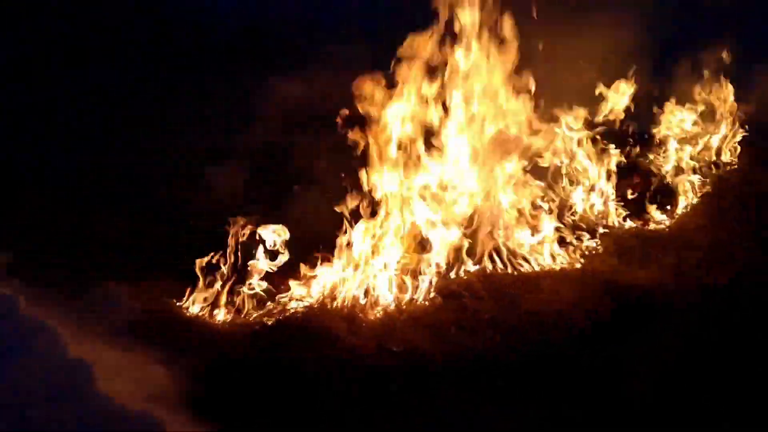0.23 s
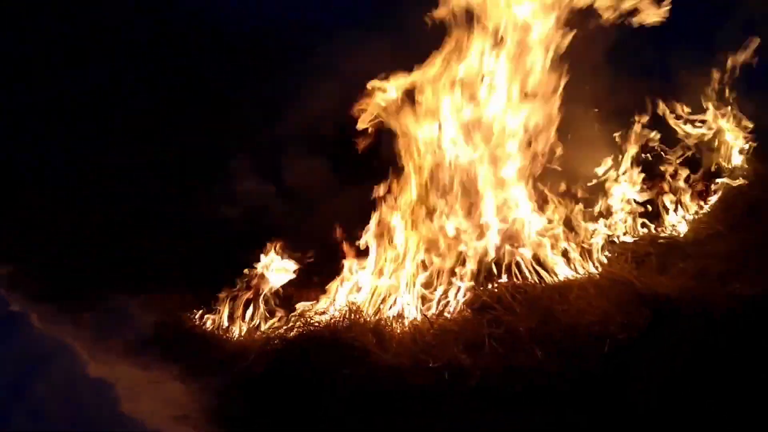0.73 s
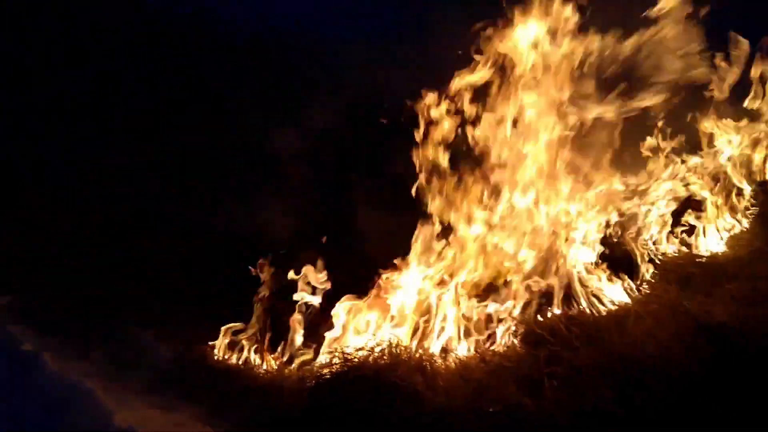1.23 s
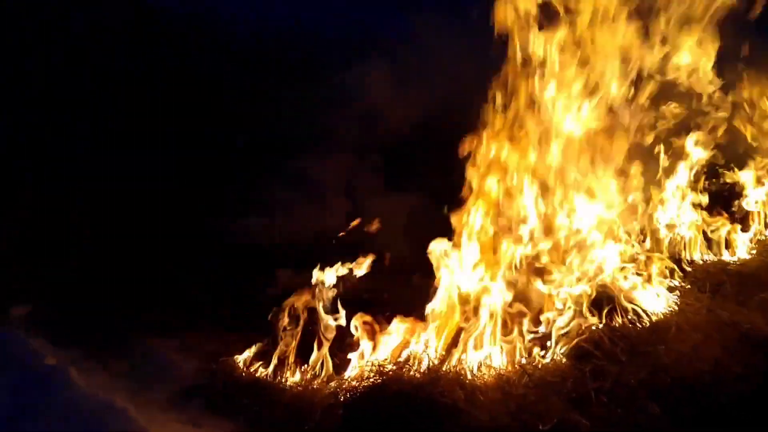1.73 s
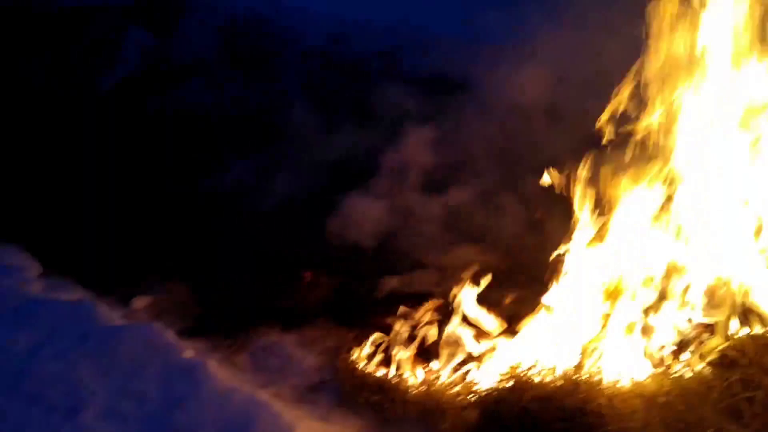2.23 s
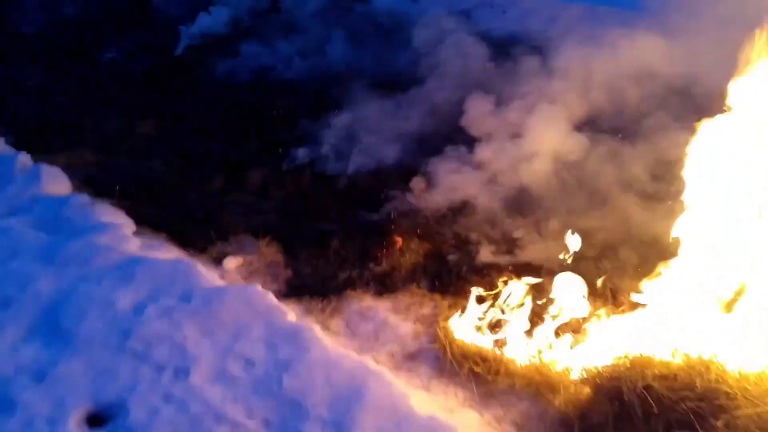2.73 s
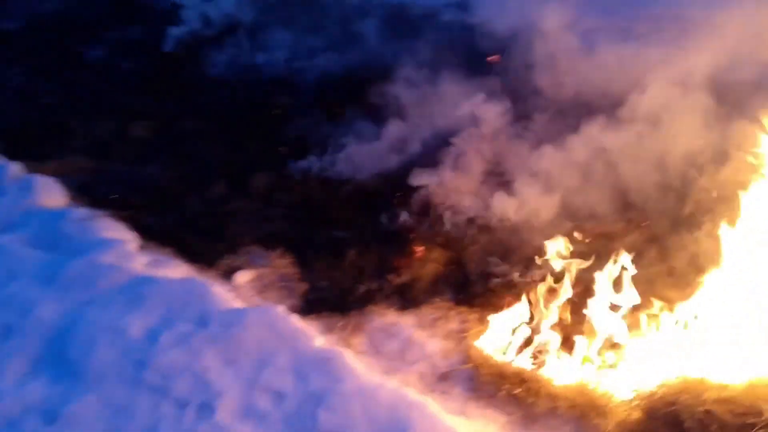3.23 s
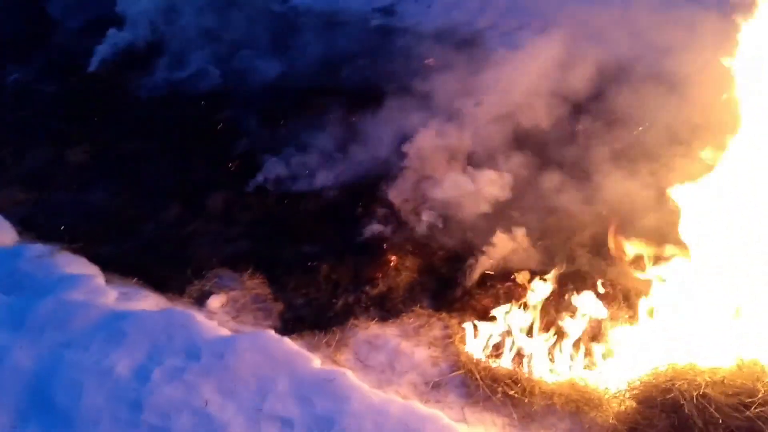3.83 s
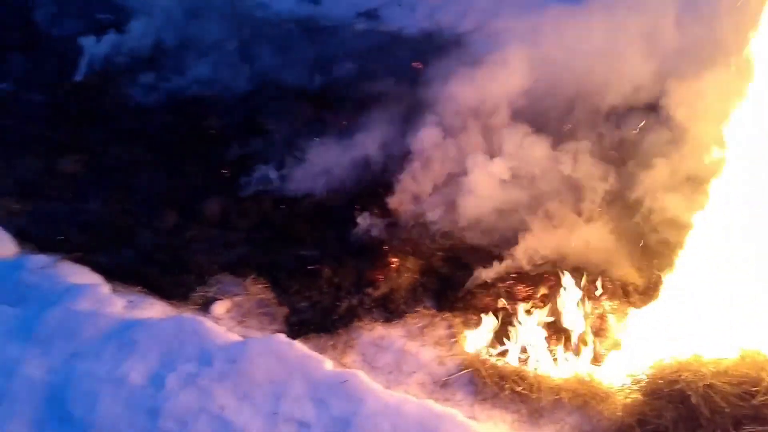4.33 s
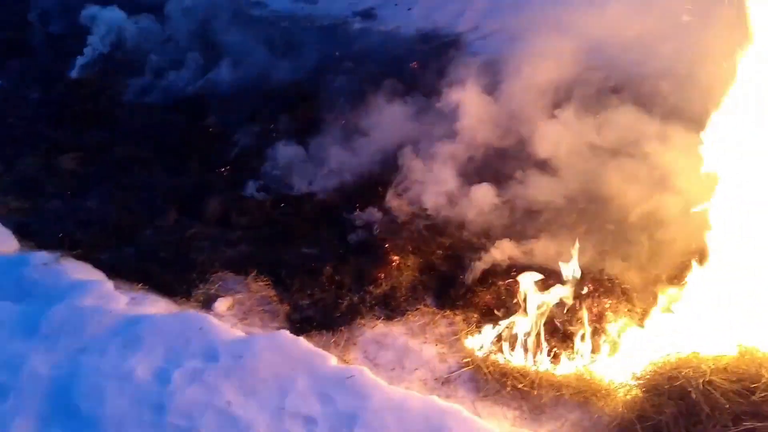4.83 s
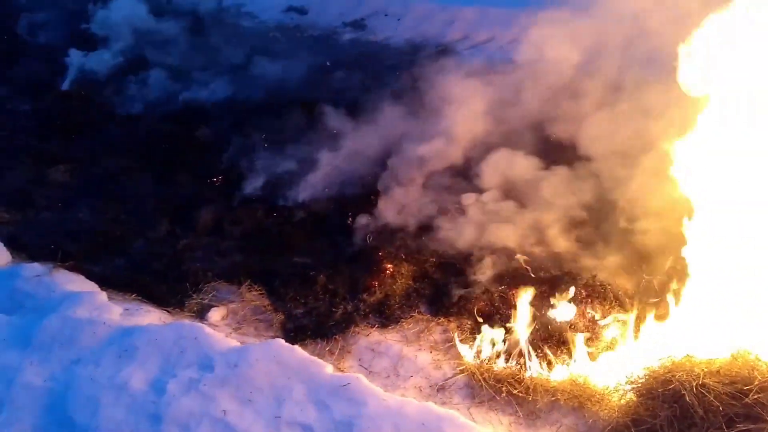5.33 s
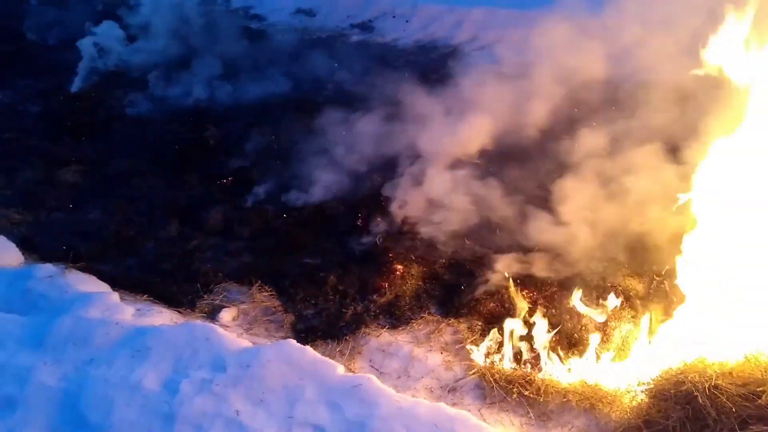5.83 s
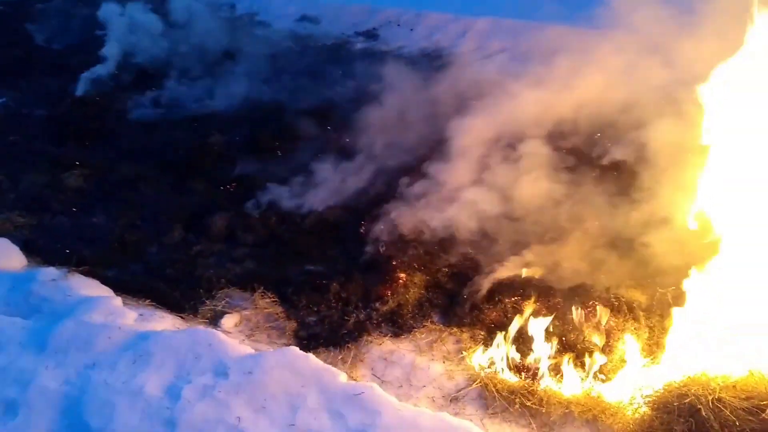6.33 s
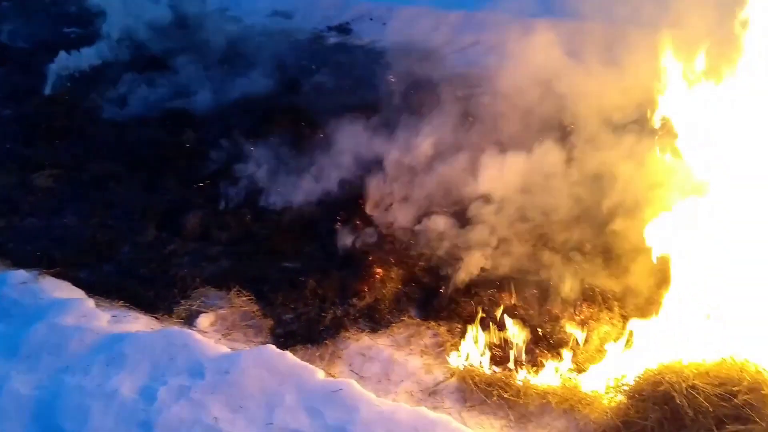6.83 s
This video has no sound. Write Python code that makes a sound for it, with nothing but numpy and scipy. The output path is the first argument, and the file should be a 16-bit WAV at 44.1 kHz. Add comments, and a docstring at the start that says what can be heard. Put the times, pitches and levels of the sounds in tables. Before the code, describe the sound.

A handheld camera stands on snow beside a grass fire. Flames flutter and rumble softly beneath a wide crisp hiss, while stalks burst in sharp, differently pitched ticks and pops. Snow crunches with dull hollow knocks, then dry stubble scrapes. Two very quick hard cracks hit left at three seconds and the level momentarily ducks. Fire alone continues, with a strong cluster of cracks around 4.5 seconds and a low wind bump later. No echo.

```python
"""Grass fire to the right of a camera on snow: from the start flames roar (surging filtered noise), blades sizzle
(noise under rupture envelopes, short pings), stems tick, and feet creak and crunch the crust (grain noise, knocks).
Stalks burst from 0.1 s, each at its own pitch; stubble rasps along a boot from 1.7 s; at 3 s a dry stem snaps twice
close by, on the left; near 5.7 s air thuds on the ports in antiphase, and again, far fainter, near 6.6 s.
The camera widens the stereo image, ducks after the loudest cracks and recovers."""
import sys
import numpy as np
from scipy import signal
from scipy.fft import rfft, irfft, next_fast_len
from scipy.io import wavfile
from scipy.ndimage import uniform_filter1d, minimum_filter1d, map_coordinates

SR = 44100
rng = np.random.default_rng(int(sys.argv[2]) if len(sys.argv) > 2 else 0)


def wrap_up_sound(samples):
    """Save the sound to the file named by the first command line argument, as 16-bit audio."""
    columns = np.atleast_2d(samples).T
    # keep every value between -1 and 1, then stretch to whole-number steps
    tamed = np.clip(columns, -1, 1)
    steps = np.round(tamed * 32767).astype(np.int16)
    wavfile.write(sys.argv[1], SR, steps)


N = 312228
BURST_SAMPLES, LEAD_SAMPLES, CLICK_SAMPLES = 1024, 96, 180  # burst buffer; its part before the onset; 4 ms

# fire strength: t/s, strength/dB
BLAZE_STRENGTH = [(0, 1.5), (0.6, 3), (1.5, 4), (2.5, 2), (3.6, -2), (4.6, -1.5), (6.0, -2), (7.08, -4)]
# coarse hiss and icy grit, relative spectrum: f/Hz, density/dB per Hz
RUSH_SPECTRUM = [(150, -3), (500, 9.5), (1000, 2), (1600, 3), (2200, 1), (3000, 5.5), (4300, 5.5),
                 (6200, 8), (8000, 7.5), (11000, -23), (15000, -80)]
# bright fizz of a bursting stem, relative spectrum: f/Hz, density/dB per Hz
FIZZ_SPECTRUM = [(3000, -54), (7000, -25), (8800, -13), (10000, -6.5), (11200, 1), (12700, 4.5),
                 (14000, -1), (15000, -27), (16500, -59)]
# crack of a bursting stem, relative spectrum: f/Hz, density/dB per Hz
CRACK_SPECTRUM = [(200, -20), (600, -24), (1300, -28), (2300, -3), (3300, 2.5), (6000, 0.5), (8000, -0.5),
                  (12000, -27)]


def amp(db):
    """Decibels to amplitude gain."""
    return 10 ** (np.asarray(db) / 20)


def unit(x):
    """Scale to rms 1."""
    return x / np.sqrt(np.mean(x ** 2) + 1e-20)


def along(points, hz):
    """Interpolate (f/Hz, value) points on a log frequency axis."""
    f, v = np.transpose(points)
    return np.interp(np.log(hz + 1), np.log(f + 1), v)


def curves(rows):
    """One value per sample for each column after the time."""
    t_s, *cols = np.transpose(rows)
    return [np.interp(np.arange(N) / SR, t_s, c) for c in cols]


def wobble(rate_hz):
    """Smooth random curve through rate_hz knots a second."""
    knots = rng.standard_normal(int(N * rate_hz / SR) + 4)
    return map_coordinates(knots, [np.arange(N) * rate_hz / SR])


def swell(peak_s, length_s):
    """Raised-cosine pulse: 1 at peak_s, 0 beyond half of length_s either side."""
    phase = np.clip((np.arange(N) / SR - peak_s) / length_s, -.5, .5)
    return np.cos(np.pi * phase) ** 2


def filtered(x, response):
    """Apply a complex response of frequency, zero-padded."""
    m = next_fast_len(N + 8192)
    return irfft(rfft(x, m) * response(np.fft.rfftfreq(m, 1 / SR)), m)[..., :N]


def causal(gain):
    """Minimum-phase response with these gains: it rings only after it is struck (folded cepstrum)."""
    cepstrum = irfft(np.log(np.maximum(gain, 1e-5)))
    fold = 1 + np.sign(np.fft.fftfreq(len(cepstrum)))
    return np.exp(rfft(cepstrum * fold))


def add(track, onset_s, sound):
    """Mix in a short sound whose onset lies LEAD_SAMPLES into its buffer."""
    start = max(round(onset_s * SR) - LEAD_SAMPLES, 0)
    track[:, start:start + sound.shape[1]] += sound[:, :N - start]


def ports(hz, lag_ms, balance_db):
    """Two-port response: the left port lags by lag_ms; balance_db is left minus right."""
    gains = np.array([amp(balance_db / 2 + 0 * hz), amp(-balance_db / 2 + 0 * hz)])
    gains = gains / np.sqrt(np.mean(gains ** 2, 0))
    lag_s = np.array([[lag_ms / 1000], [0]])
    return gains * np.exp(-2j * np.pi * hz * lag_s)


def grains(rate_hz, spread_db, life_ms):
    """Envelope, rms 1, of random tiny ruptures: many weak, a few strong, each decaying by e in life_ms."""
    strikes = rng.random(N) < rate_hz / SR
    power = strikes * amp(spread_db * np.minimum(rng.standard_normal(N), 2.6)) ** 2
    keep = np.exp(-2 / (abs(life_ms) * SR / 1000))  # 2: power decays twice as fast as amplitude
    return unit(np.sqrt(signal.lfilter([1], [1, -keep], power)))


def spread(envelope, spectrum, lag_ms, scatter):
    """Noise under an envelope, rms 1: a direct part common to the ports, a scattered part that differs."""
    # camera body shades the left port: f/Hz, left minus right/dB
    shade = [(60, -2.5), (200, -4), (700, -2.5), (1500, 3), (2600, -2), (6000, -1), (8000, -1), (11000, -3),
             (14000, -10.5)]
    scatter = np.clip(scatter, 0, 1)
    direct = np.sqrt(1 - scatter) * rng.standard_normal(N)
    scattered = np.sqrt(scatter) * rng.standard_normal((2, N))
    noise = (direct + scattered) * envelope
    return unit(filtered(noise, lambda hz: amp(along(spectrum, hz)) * ports(hz, lag_ms, along(shade, hz))))


def rupture(spectrum, lag_ms, balance_db, life_ms, tail_db, ripple_db):
    """Crack with unit power over 4 ms: short swell, sharp front, splintering; random ripple colours it."""
    rise_ms = 0.29  # noise swells briefly before the front, growing by e in this time
    ms = (np.arange(BURST_SAMPLES) - LEAD_SAMPLES) * 1000 / SR
    hz = np.fft.rfftfreq(BURST_SAMPLES, 1 / SR)
    life_ms = max(life_ms, .1)
    front_decay = (ms >= 0) * np.exp(-np.abs(ms) / 0.095)
    front = unit((ms == 0) + 0.18 * rng.standard_normal(BURST_SAMPLES) * front_decay)
    noise = rng.standard_normal(BURST_SAMPLES) + 0.76 * rng.standard_normal((2, BURST_SAMPLES))
    noise_envelope = np.exp(-np.abs(ms) / np.where(ms < 0, rise_ms, life_ms))
    splinters = np.sqrt(life_ms) * unit(noise * noise_envelope)  # slower splintering carries more energy
    ripple = map_coordinates(rng.standard_normal(34), [hz / 700], mode="nearest")  # a knot every 700 Hz
    colour = causal(amp(along(spectrum, hz) + ripple_db * ripple)) * ports(hz, lag_ms, balance_db)
    burst = irfft(rfft(front + amp(tail_db) * splinters) * colour)
    return unit(burst) * np.sqrt(CLICK_SAMPLES / BURST_SAMPLES)


def flames():
    """Turbulent hot gas roars in uneven surges; the draught it draws rumbles mostly apart on each port."""
    # surging of roar and draught: t/s, level/dB
    surge = [(0, -48.5), (0.8, -47.5), (1.0, -47), (1.25, -47), (1.65, -48.5), (1.8, -46), (1.95, -49),
             (2.5, -48), (2.9, -48.5), (3.2, -50), (3.45, -47.5), (3.62, -53), (3.8, -48.5), (4.4, -49),
             (4.6, -48.5), (5.0, -49), (5.95, -48), (6.25, -51), (6.5, -49), (7.08, -49)]
    # roar, relative spectrum: f/Hz, density/dB per Hz
    roar_spectrum = [(40, -23), (80, -2), (125, 2), (180, 0), (270, -4.5), (400, -11.5), (700, -13.5),
                     (1500, -24.5), (4000, -99)]
    # draught on the ports, relative spectrum: f/Hz, density/dB per Hz
    draught_spectrum = [(18, -23), (33, -25), (45, -3.5), (60, 0.5), (85, -1), (120, -23), (200, -8.5),
                        (500, -60)]
    surge_db, = curves(surge)
    roar = spread(amp(1.87 * wobble(17) + 0.31 * wobble(5.6)), roar_spectrum, lag_ms=0.025, scatter=0.096)
    draught = spread(amp(2.6 * wobble(13) + 0.6 * wobble(3.7)), draught_spectrum, lag_ms=0, scatter=0.9)
    return amp(surge_db) * (roar + amp(-5.5) * draught)


def pinging_blades(rate_hz, pitch_hz, cycles, spread_db):
    """Hollow blades split, each a 4 ms ping at its own pitch, decaying by e in `cycles` periods; rms 1."""
    when, pitch, size, side = rng.random((int(rate_hz * N / SR), 4)).T
    hz = pitch_hz * 2 ** (1.6 * (pitch[:, None] - .5))  # 1.6 octaves wide
    age = np.arange(CLICK_SAMPLES)
    turns = hz * age / SR
    sizes = amp(-spread_db * np.log(size[:, None] + 0.083))
    pings = sizes * np.sin(2 * np.pi * turns) * np.exp(-turns / cycles)
    index = ((when * N).astype(int)[:, None] + age).ravel()
    shares = [np.sqrt(side), np.sqrt(1 - side)]
    return unit(np.array([np.bincount(index, (pings * share[:, None]).ravel(), N)[:N] for share in shares]))


def burning_grass():
    """Blades rupture by the thousand along a wide front; shared flurries drive both sizzle and rush."""
    # swells of the hiss, as when a tuft catches: peak t/s, length/s, rise/dB
    flares = [(0.168, 0.097, 4), (0.339, 0.16, 11), (1.154, 0.11, 0), (2.955, 0.058, 8), (3.2, 0.37, 1.5),
              (3.437, 0.097, 8.5), (3.827, 0.16, 5.5), (4.174, 0.13, 1.5), (4.65, 0.35, 1),
              (4.98, 0.044, 6), (6, 0.23, 4)]
    # fine sizzle, relative spectrum: f/Hz, density/dB per Hz
    sizzle_spectrum = [(3000, -51), (7000, -34), (8800, -7), (10000, -5), (11200, 2.5), (12700, 4),
                       (14200, 0), (14650, -50), (16500, -85)]
    blaze_db, = curves(BLAZE_STRENGTH)
    flare_db = sum(db * swell(peak_s, length_s) for peak_s, length_s, db in flares)
    sizzle_db = -45.5 + blaze_db + flare_db
    rush_db = -53 + 0.39 * blaze_db + 0.69 * flare_db  # the rush follows only in part
    flurries = amp(0.17 * wobble(9.6) + 2.2 * wobble(70))
    fine = flurries * grains(rate_hz=5000, spread_db=1.5, life_ms=1.0)
    coarse = flurries * grains(rate_hz=3000, spread_db=7.0, life_ms=5.2)
    sizzle = amp(sizzle_db) * spread(fine, sizzle_spectrum, lag_ms=0.371, scatter=0.97)
    rush = amp(rush_db) * spread(coarse, RUSH_SPECTRUM, lag_ms=0.076, scatter=0.94)
    pings = pinging_blades(rate_hz=470, pitch_hz=4880, cycles=200, spread_db=1.0)
    return sizzle + rush + amp(rush_db - 7.5) * pings


def crackling(rate_hz, size_db, spread_db):
    """Thin stems tick at random, most of them weak, some bright and some dull."""
    blaze_db, = curves(BLAZE_STRENGTH)
    vigour_db = 0.68 * blaze_db + 2.0 * wobble(9)  # a fiercer fire ticks harder; tufts wax and wane
    out = np.zeros((2, N))
    for when, size, tone, side in rng.random((int(rate_hz * N / SR), 4)):
        db = vigour_db[int(when * N)] + size_db - spread_db * np.log(size + 0.098)
        fizz = rupture(FIZZ_SPECTRUM, 0.314 * side, -7.5, life_ms=1.0, tail_db=-2.0, ripple_db=9.5)
        crack = rupture(CRACK_SPECTRUM, 0.2 * side, -2.4, life_ms=0.97, tail_db=1.0, ripple_db=5.5)
        add(out, when * N / SR, amp(db) * (fizz + amp(-6.0 - 5.5 * tone) * crack))
    return out


def tread():
    """Pressure of the feet on snow: each step builds up, holds and dies away, in small lurches."""
    # steps: full weight at t/s, hold/s, pressure/dB
    steps = [(0.129, 0.18, -51.5), (0.766, 0.23, -53), (1.08, 0.2, -53.5), (1.477, 0.066, -57.5),
             (1.735, 0.18, -52.5), (2.067, 0.15, -54.5), (2.784, 0.22, -51), (3.425, 0.075, -49),
             (3.779, 0.064, -50.5), (4.035, 0.084, -61)]
    attack_s, release_s = 0.019, 0.098  # linear onset; decay by e as the snow settles
    t = np.arange(N) / SR
    pressure = 0
    for full_s, hold_s, db in steps:
        onset = np.clip(1 + (t - full_s) / attack_s, 0, 1)
        settling = np.exp(-np.maximum(t - full_s - hold_s, 0) / release_s)
        pressure = pressure + amp(db) * onset * settling
    return amp(3.1 * wobble(30.56)) * pressure


def footsteps():
    """Snow grains break under the sole with an icy edge; crust gives way in dull knocks."""
    # crust giving way: t/s, level/dB, f/Hz, crumbling/ms
    crunches = [(.18, -53.5, 1000, 3), (.192, -53, 950, 4), (.226, -49, 600, 8.3), (.277, -48, 513, 5.4),
                (0.308, -54, 830, 4), (0.342, -44, 520, 9.3), (.453, -52, 577, 11), (0.525, -59, 460, 3),
                (.862, -49, 328, 5), (.995, -50, 800, 2.1), (1.551, -53.5, 427, 4.4),
                (1.794, -52, 402, 6.4), (1.85, -52, 750, 12), (1.925, -53, 700, 7.4),
                (1.968, -51.5, 486, 4.5), (2.09, -43.5, 453, 6), (2.175, -48.5, 566, 3.6),
                (2.213, -52, 447, 4.1), (2.741, -47.5, 450, 2.4), (2.778, -54.5, 750, 11),
                (2.865, -51, 600, 3.7), (3.5115, -50, 560, 1.5), (3.531, -49.5, 523, 2.2),
                (3.552, -47, 760, 0.88), (3.600, -50, 514, 6.4), (3.7848, -47.5, 600, 1.2),
                (3.8083, -48.5, 620, 0.7)]
    # snow crunch, relative spectrum: f/Hz, density/dB per Hz
    snow_spectrum = [(80, -21), (250, -7), (520, -0.5), (900, -3), (1500, -9), (2400, -6.5), (5000, -13.5),
                     (10000, -94)]
    shuffle_db, grit_db = -75.5, -6.5  # steady creak under standing feet; grit gain
    push_db, tone_width = 17.5, 0.6  # first push over the crumbling; breadth of the hollow tone
    pressure = tread()
    crunch = spread(grains(rate_hz=600, spread_db=5.0, life_ms=8.8), snow_spectrum, lag_ms=0, scatter=0.33)
    grit = spread(grains(rate_hz=3100, spread_db=7.0, life_ms=3.6), RUSH_SPECTRUM, lag_ms=0.044, scatter=1.0)
    out = amp(2.0) * (pressure + amp(shuffle_db)) * crunch + amp(grit_db) * pressure * grit
    t = np.arange(2 * BURST_SAMPLES) / SR
    hz = np.fft.rfftfreq(len(t), 1 / SR)
    for onset_s, db, pitch_hz, life_ms in crunches:
        crumbling = rng.standard_normal(len(t)) * np.exp(-t * 1000 / life_ms)
        collapse = np.roll(amp(push_db) * (t == 0) + crumbling, LEAD_SAMPLES)
        hollow = np.exp(-np.log((hz + 1) / pitch_hz) ** 2 / tone_width)
        knock = unit(irfft(rfft(collapse) * causal(hollow)))
        add(out, onset_s, amp(db) * knock[None])
    return out


def stalk_crack(ring_hz):
    """Crack spectrum with a stalk's own resonance raised 8.5 dB around ring_hz."""
    hz = np.geomspace(CRACK_SPECTRUM[0][0], CRACK_SPECTRUM[-1][0], 80)
    ring = np.exp(-(np.log2(hz / ring_hz) / 0.25) ** 2)  # width in octaves
    return np.column_stack([hz, along(CRACK_SPECTRUM, hz) + 8.5 * ring])


def bursting_stalks():
    """Steam splits single stalks: bright fizz, a crack at the stalk's own pitch and a hollow pop."""
    # loudest stalks: t/s, fizz level/dB, crack level/dB, pop level/dB, splintering/ms, f/Hz
    bursts = [(0.1128, -29, -44, -50, 0.88, 6200.0), (0.1412, -28, -52, -59.5, 0.5, 6800.0),
              (0.466, -36, -43, -51, 1.9, 7600), (0.6016, -37, -51, -56, 0.9, 3600),
              (0.495, -34, -45, -63.5, 2.6, 7300.0), (0.5, -31.5, -53, -48, 1.7, 4700.0),
              (0.6275, -30.5, -39.5, -67, 1.1, 7300.0), (0.6956, -31, -44, -54, 3.5, 3500.0),
              (0.7148, -31, -47, -63.5, 1.3, 6700.0), (0.721, -29, -43.5, -48, 1.3, 4100.0),
              (0.767, -30, -45, -60.5, 0.5, 4800.0), (0.781, -23, -33.5, -35, 1.3, 2700.0),
              (0.8624, -26, -41, -45, 0.71, 4000.0), (0.8697, -26, -34, -42.5, 1.6, 3600.0),
              (0.876, -35, -40, -42, 4, 3000), (0.895, -44, -43, -45, 1.2, 3400),
              (0.8829, -22, -30, -46, 1.3, 3970), (0.986, -34.5, -38.5, -44, 1.9, 4000),
              (1.1, -31.5, -41, -60.0, 0.6, 4600.0), (1.1453, -32, -34.5, -48, 1.4, 4800.0),
              (1.1712, -35, -38.5, -52, 2.4, 3300), (1.2558, -45, -41, -35.5, 2.3, 3500),
              (1.2738, -26.5, -32, -47, 1.5, 4000.0), (1.3435, -34, -41, -56, 0.7, 3000),
              (1.4502, -44, -56, -59, 0.7, 6200), (1.3565, -28.5, -40, -67, 0.4, 3700.0),
              (1.3679, -30, -39, -48, 1.5, 5270), (1.6026, -37, -47, -57, 0.8, 3700),
              (1.6398, -37, -49, -52, 0.8, 3300), (1.6437, -37, -45, -52, 0.9, 3600),
              (1.76, -33, -42.5, -58, 1.3, 6500), (1.765, -40, -40.5, -51, 1.3, 5700),
              (1.9379, -30, -29.0, -55, 0.37, 5700.0), (1.9622, -24, -38, -62.5, 1, 5600.0),
              (1.9785, -36, -40, -59, 2.2, 7800.0), (1.9834, -34, -39, -50, 0.5, 5300.0),
              (2.058, -41, -44, -50, 1, 6000), (2.0672, -36, -43, -62, 0.7, 5700),
              (2.0762, -35, -42, -55, 0.8, 6000), (2.1266, -36, -38.5, -44.0, 1.1, 7160),
              (2.16, -32, -36, -57, 1.3, 6500), (2.2554, -29, -32.5, -45, 4.2, 7100),
              (2.3427, -33.5, -47, -65.5, 1.0, 7300), (2.371, -38, -46, -57, 0.8, 3400),
              (2.441, -41, -43, -52.5, 0.8, 5800), (2.4473, -35, -44, -60, 0.8, 7700),
              (2.5315, -33, -48, -64.5, 0.55, 7800.0), (2.63, -32.5, -43, -56.0, 0.58, 4700.0),
              (2.742, -39, -42, -66, 1.1, 6100), (2.781, -35, -42, -45, 1.9, 7300.0),
              (2.883, -36, -40, -51, 1.1, 4960), (2.9227, -36, -31.5, -49, 1.1, 5570),
              (3.138, -37, -51, -64, 0.8, 6600), (3.24, -32, -39.5, -58, 2.8, 7400.0),
              (3.3882, -28.5, -37, -51, 1.1, 6800.0), (3.5462, -31, -39, -46, 1.1, 6200.0),
              (3.6773, -39, -50, -60, 0.71, 5200.0), (3.7273, -36.5, -42.5, -46, 0.6, 5800.0),
              (3.7992, -34.5, -45, -57.0, 0.43, 3000.0), (3.8207, -36, -37.5, -54, 1.7, 3700.0),
              (3.863, -38, -48, -46, 0.68, 6100.0), (3.919, -39, -46, -59, 0.9, 6000),
              (3.9956, -38, -45, -59, 0.7, 5900), (4.1648, -35, -52, -51, 0.6, 4900.0),
              (4.1715, -42, -45, -65, 1, 4500.0), (4.178, -45, -47, -60, 0.9, 5800),
              (4.184, -47, -43, -56, 0.9, 6000), (4.2582, -32, -41.5, -62, 0.5, 5800.0),
              (4.4082, -33, -38, -65.0, 1.6, 4160), (4.4313, -24, -26.5, -43, 1.5, 3600),
              (4.4566, -20, -32, -43, 0.6, 3800.0), (4.496, -42, -38, -57, 0.7, 5200.0),
              (4.5043, -28, -30.5, -44, 5.2, 6600.0), (4.561, -43.5, -35.5, -62.0, 0.98, 5800.0),
              (4.57, -43, -46, -58, 0.9, 6100), (4.6023, -30.5, -30.5, -52, 1.1, 5070),
              (4.6384, -39, -42.5, -56, 0.8, 5900), (4.68, -40, -49, -63, 0.87, 6200),
              (4.7426, -31.0, -37, -41, 1.4, 5500.0), (4.7602, -37, -43, -56, 0.7, 7600),
              (4.772, -40, -48, -56, 1.2, 6200), (4.8131, -30, -36.5, -58, 0.9, 4150),
              (4.931, -44, -57, -62, 0.7, 5700), (4.9739, -24.5, -35, -45, 0.8, 5340),
              (4.9831, -45, -44, -55, 0.9, 7100), (4.992, -46, -45.5, -53.0, 0.8, 6600.0),
              (5.0065, -44, -49, -57, 0.9, 5800), (5.0248, -47, -39.5, -41, 0.98, 3980),
              (5.0861, -40, -47, -67, 2.6, 5500.0), (5.091, -34.5, -47, -68, 0.6, 6300.0),
              (5.1514, -35.5, -43, -68.0, 0.6, 6600.0), (5.204, -37, -51, -57, 0.89, 6800.0),
              (5.256, -39, -45, -58, 0.8, 5500), (5.3164, -39, -43, -58, 0.8, 5900),
              (5.348, -35.5, -43, -58.5, 1.6, 5900.0), (5.3603, -34.0, -41.5, -60.5, 1.3, 4330),
              (5.4056, -29, -35, -61, 0.38, 5030), (5.468, -31, -38, -45.5, 2.7, 5900.0),
              (5.5278, -38.5, -45, -62, 0.9, 6400.0), (5.5799, -41, -55.5, -66.5, 0.5, 5900.0),
              (5.6234, -35.5, -43, -58, 0.4, 6800.0), (5.7416, -32.5, -46, -58, 0.6, 6200.0),
              (5.785, -32.0, -39, -53, 0.7, 7000.0), (5.7924, -51, -40.5, -44.5, 0.51, 2700),
              (5.89, -23.5, -32, -39.5, 1.5, 4130), (5.92, -38, -44, -61, 0.8, 5600),
              (5.956, -38, -49, -66, 0.8, 6400), (5.971, -39, -36.5, -57.5, 1.1, 5700.0),
              (6.0456, -30, -33.5, -47, 0.61, 4730), (6.13, -38, -49, -56, 0.88, 6000),
              (6.175, -49, -51, -59, 0.81, 3630), (6.1902, -32.5, -39, -63, 0.32, 4230),
              (6.2204, -36.0, -40, -62, 3.5, 6200.0), (6.228, -34.5, -43, -53, 1.6, 2700.0),
              (6.256, -42, -43, -55.5, 1.3, 5600), (6.272, -37, -42, -56, 1, 7600),
              (6.3248, -37, -45, -60, 0.8, 6450), (6.359, -36, -43, -70, 1.6, 5000),
              (6.3833, -34, -48, -72, 0.49, 2620), (6.4095, -41, -45, -62, 0.8, 5630),
              (6.428, -39, -48, -63.0, 0.6, 7600.0), (6.4597, -41, -50, -67, 0.7, 5900.0),
              (6.49, -42, -41, -50, 1.1, 5050), (6.5904, -49, -37.5, -44, 2.7, 3330),
              (6.6478, -45, -47, -57, 0.8, 3700), (6.6727, -42, -45, -65, 1, 7600),
              (6.6768, -27, -41, -60, 0.62, 7200), (6.78, -41, -56, -69, 0.6, 4700.0),
              (6.815, -32, -36.5, -54.0, 1.3, 4230), (6.9127, -35.5, -47, -69, 1.6, 6300.0),
              (6.993, -35, -50, -66, 0.8, 7700.0), (7.019, -42, -49, -61, 0.8, 5800)]
    # hollow body of a thick stalk, relative spectrum: f/Hz, density/dB per Hz
    pop_spectrum = [(100, -4), (400, -18), (1100, 4.5), (1700, 1), (2600, 1), (5000, -35)]
    out = np.zeros((2, N))
    for onset_s, fizz_db, crack_db, pop_db, life_ms, ring_hz in bursts:
        lag_ms = rng.uniform(0.071, 0.289)
        fizz = rupture(FIZZ_SPECTRUM, lag_ms, -6, life_ms, tail_db=0.0, ripple_db=1.5)
        crack = rupture(stalk_crack(ring_hz), lag_ms, -2.5, life_ms, tail_db=0.5, ripple_db=1.1)
        pop = rupture(pop_spectrum, lag_ms, 0.96, life_ms, tail_db=4.5, ripple_db=1.0)
        add(out, onset_s, amp(fizz_db) * fizz + amp(crack_db) * crack + amp(pop_db) * pop)
    return out


def scraping_stubble():
    """Stiff dry stems catch and slip on a boot in a harsh grainy rasp."""
    # scrapes: peak t/s, length/s, level/dB
    scrapes = [(1.79, 0.17, -47), (2.783, 0.05, -48), (2.86, 0.094, -41), (2.96, 0.19, -47)]
    # rasp, relative spectrum: f/Hz, density/dB per Hz
    rasp_spectrum = [(1000, -22), (2000, -10), (2700, -1), (3600, 3), (5000, -8), (6200, -10), (10000, -24),
                     (15000, -80)]
    stroke = sum(amp(db) * swell(peak_s, length_s) for peak_s, length_s, db in scrapes)
    rasping = grains(rate_hz=1400, spread_db=5.5, life_ms=1.6)
    return stroke * spread(rasping, rasp_spectrum, lag_ms=-0.13, scatter=0.72)


def snapping_stem():
    """Two loud cracks a little to the left, each with a splinter; all ring the modes of one dry stem."""
    # main cracks and splinters: t/s, level/dB
    snaps = [(2.9909, -16), (2.9987, -27.5), (3.0094, -13.5), (3.0225, -23)]
    # stem modes: f/Hz, relative level/dB, t60/s
    modes = [(1560, 0.5, 0.024), (2150, 1, 0.01), (3150, 14, 0.0056), (4000, 10, 0.0035),
             (5930, 20, 0.0043), (8600, 8, 0.0038), (13100, -10, 0.0035)]
    # snap, relative spectrum: f/Hz, density/dB per Hz
    snap_spectrum = [(150, -34), (600, -17.5), (1400, -6.5), (2300, 5.5), (3000, 2), (6000, -1.5),
                     (8500, -5.5), (14000, -6.5), (16500, -32)]
    out = np.zeros((2, N))
    t = np.maximum(np.arange(BURST_SAMPLES) - LEAD_SAMPLES, 0) / SR
    for onset_s, db in snaps:
        ring = 0
        for hz, mode_db, t60_s in modes:
            decay = amp(mode_db + rng.normal(0, 0.81) - 60 * t / t60_s)
            ring = ring + decay * np.sin(2 * np.pi * hz * rng.normal(1, 0.03) * t)
        ring = unit(ring) * np.sqrt(CLICK_SAMPLES / BURST_SAMPLES) * amp([[0], [-2.5]])  # right port weaker
        crack = rupture(snap_spectrum, lag_ms=-0.132, balance_db=3.5, life_ms=0.77, tail_db=5.0, ripple_db=0.5)
        add(out, onset_s, amp(db) * (amp(-10.0) * ring + amp(-5.0) * crack))
    return out


def buffeting():
    """Puffs of air thud on the two ports in opposite senses."""
    # puffs: peak t/s, length/s, level/dB
    gusts = [(5.733, 0.16, -36.5), (6.6, 0.14, -55)]
    # dull thud, relative spectrum: f/Hz, density/dB per Hz
    thud_spectrum = [(20, -20), (65, -3), (110, -6), (200, -20), (500, -44)]
    thud = unit(filtered(rng.standard_normal(N), lambda hz: amp(along(thud_spectrum, hz))))
    puffs = sum(amp(db) * swell(peak_s, length_s) for peak_s, length_s, db in gusts)
    return np.array([[1], [-1]]) * thud * puffs


def scene():
    """Open air, no echo: the fire, the feet, a snapping stem and a little wind."""
    fire = flames() + burning_grass() + crackling(rate_hz=72, size_db=-50, spread_db=3.5)
    feet = footsteps() + scraping_stubble()
    return fire + feet + bursting_stalks() + snapping_stem() + buffeting()


def widen(x, delay_ms):
    """Widen the stereo: each side loses a delayed, frequency-dependent share of the other."""
    # crossfeed: f/Hz, share
    crossfeed = [(1100, 0.091), (1600, 0.35), (2200, 0.76), (3500, 0.35), (6000, 0.55), (8000, 0.12),
                 (14000, 0.24)]
    delayed_share = lambda hz: along(crossfeed, hz) * np.exp(-2j * np.pi * hz * delay_ms / 1000)
    return x - filtered(x[::-1], delayed_share)


def gain_control(x, threshold_db, attack_s, hold_s, release_s):
    """Cracks over the threshold pull the gain down 28 ms late; it holds, then creeps back."""
    power = np.abs(uniform_filter1d(np.mean(x ** 2, 0), CLICK_SAMPLES))
    needed_db = np.minimum(threshold_db - 10 * np.log10(power + 1e-12), 0)
    late_db = np.pad(needed_db, (round(.028 * SR), 0))[:N]
    # window over the last span_s only
    past = lambda span_s: dict(size=2 * int(span_s * SR / 2) + 1, origin=int(span_s * SR / 2), mode="constant")
    held_db = minimum_filter1d(late_db, **past(hold_s))
    recovering_db = np.minimum(held_db, uniform_filter1d(held_db, **past(release_s)))
    smooth_db = uniform_filter1d(recovering_db, **past(attack_s))
    return x * amp(1.28 * smooth_db)  # ducks deeper than the excess


def record(dry):
    """The camera widens the image, rides its gain, rounds off the highest peaks and cuts the top."""
    wide = widen(dry, delay_ms=.425)
    ridden = gain_control(wide, threshold_db=-23.5, attack_s=0.0033, hold_s=0.19, release_s=0.3)
    rounded = ridden / (1 + (ridden / .76) ** 4) ** .25  # saturates at 0.76
    return filtered(rounded, lambda hz: hz < 16800)


dry = scene()
out = record(dry)
wrap_up_sound(out)
```